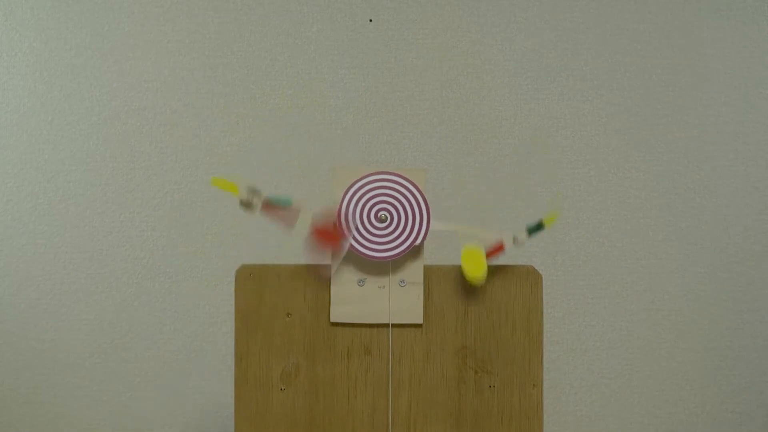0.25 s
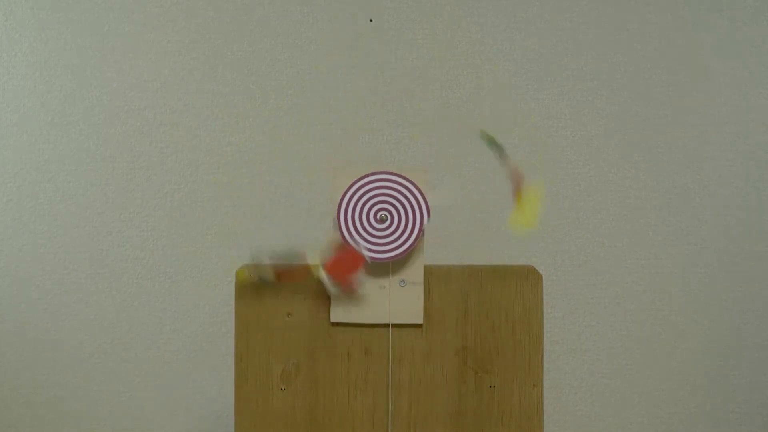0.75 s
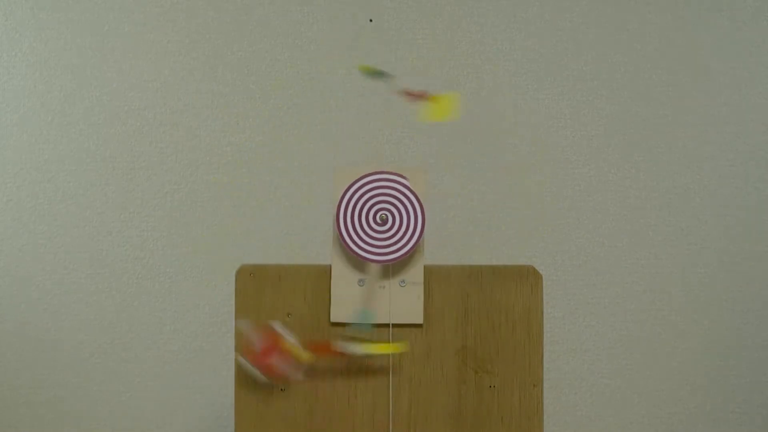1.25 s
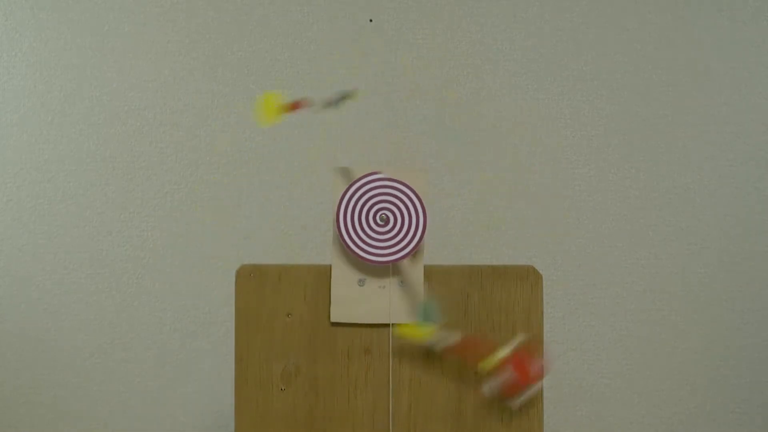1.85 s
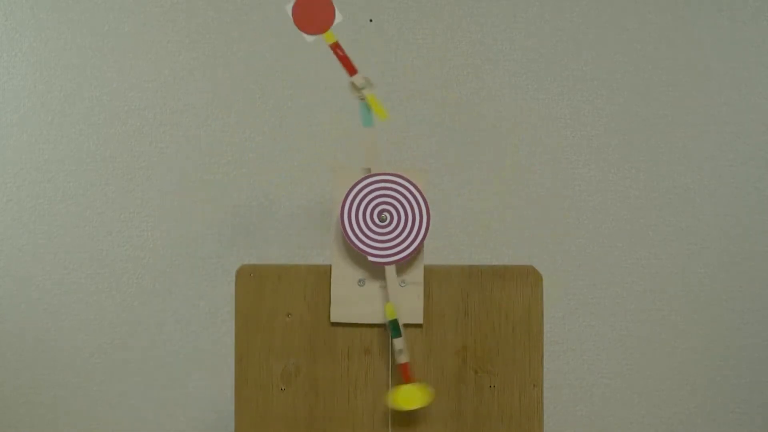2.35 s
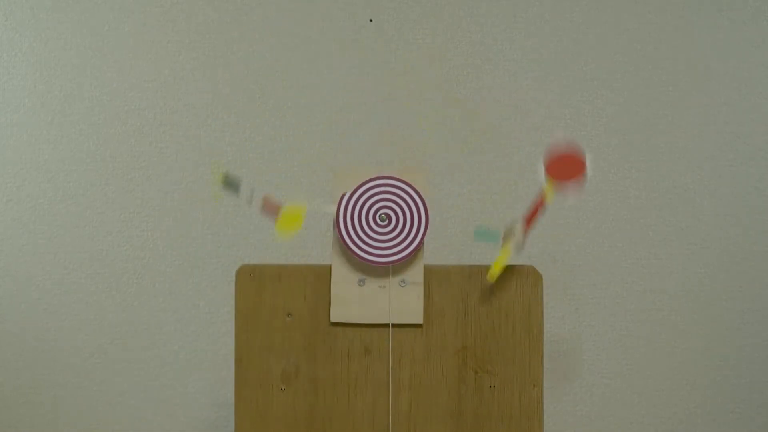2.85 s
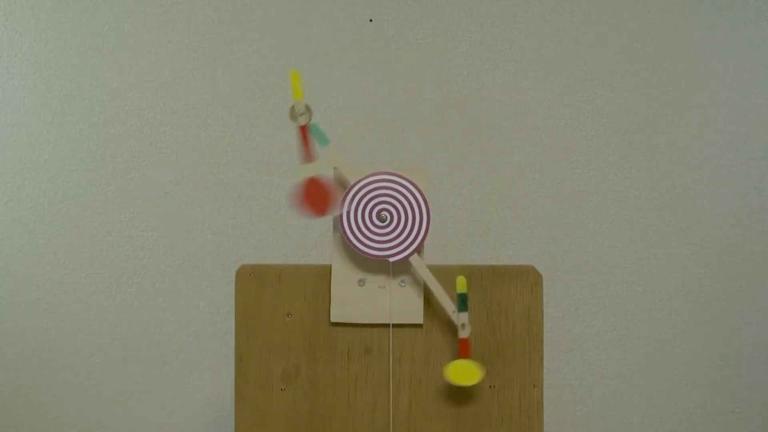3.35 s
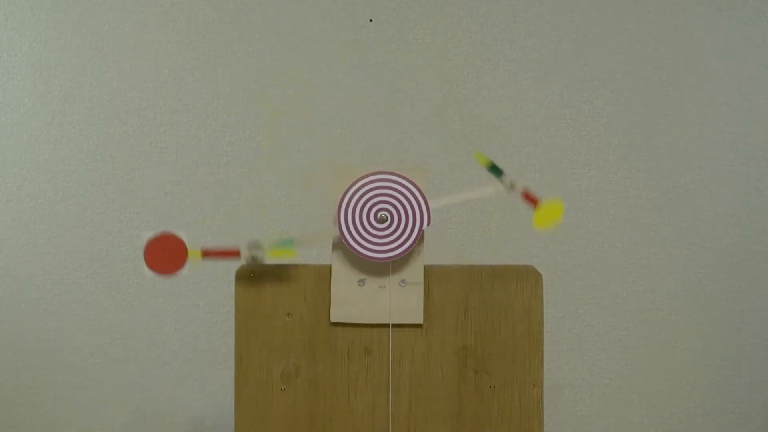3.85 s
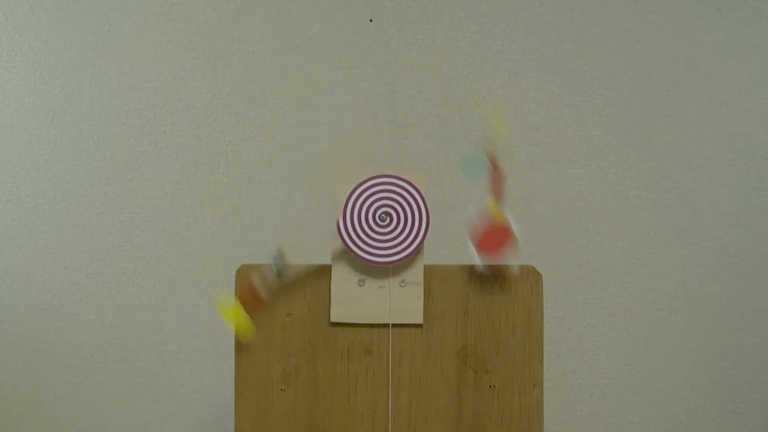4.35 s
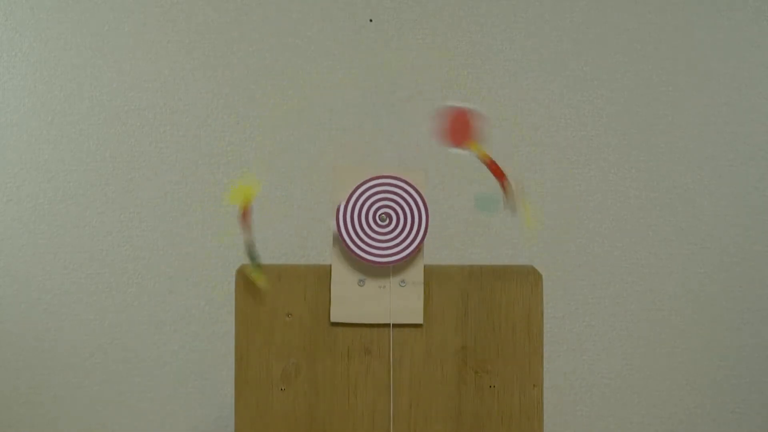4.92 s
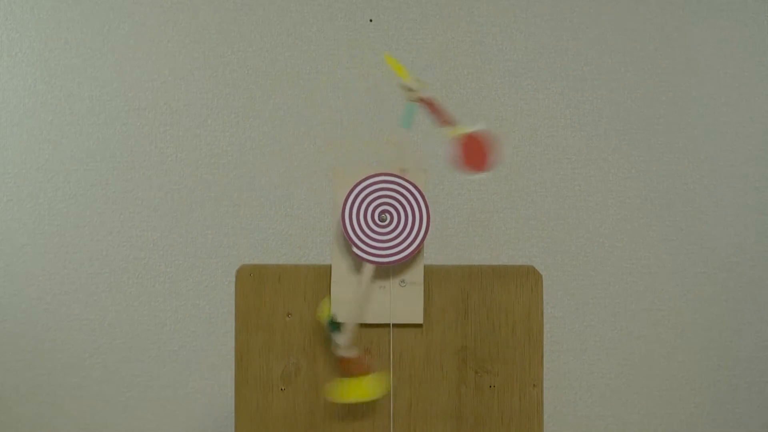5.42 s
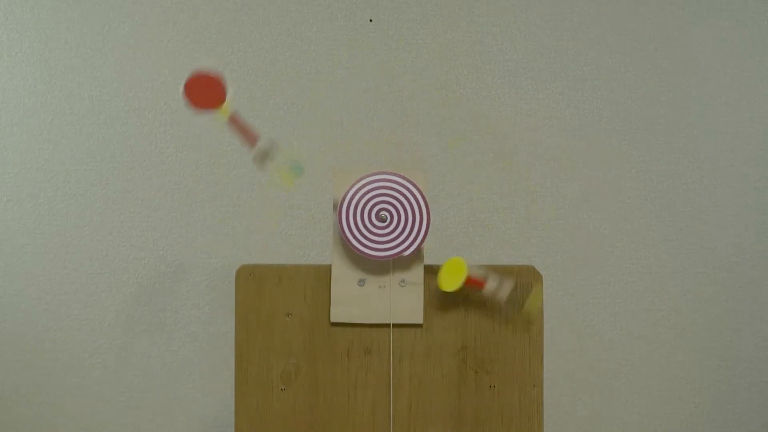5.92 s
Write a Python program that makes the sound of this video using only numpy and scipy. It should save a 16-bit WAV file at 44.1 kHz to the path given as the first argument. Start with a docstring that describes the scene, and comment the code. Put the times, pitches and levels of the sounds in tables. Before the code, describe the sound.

Loose pivots clack against their steel pins as two swinging arms tumble on a wooden board. Early knocks are bright and crowded, followed by scattered faint taps and near-quiet gaps. Then a heavy double knock with a low board thump and short hollow ring starts another irregular run of ticks and clacks. Short room reflections follow each contact, over faint bearing friction and a constant soft hiss, heard in stereo from nearby.

```python
"""Knocks of loose pivots lead, as a wooden double-pendulum sculpture tumbles on a board in a small room.
Each knock is a contact with echoes, filtered noise swelling in the resonant frame, modes and a room tail.
Steel pins ping as decaying sines with narrow-band noise, and heavy knocks shake the board as low noise.
One hard jolt rings a whole arm as a sum of decaying modes.
The bearings rub faintly as noise heard through the frame, over a steady stereo hiss."""
import sys
import numpy as np
from scipy import signal
from scipy.fft import rfft, irfft, next_fast_len
from scipy.io import wavfile
from scipy.ndimage import uniform_filter1d

SR = 44100
rng = np.random.default_rng(int(sys.argv[2]) if len(sys.argv) > 2 else 0)


def dump_mix(stems):
    """Bounce the given channels to the path in sys.argv[1] as a 16-bit WAV at rate SR."""
    frames = np.atleast_2d(stems).T  # one column per channel
    limited = np.clip(frames, -1, 1)  # hard clip at full scale
    pcm = np.round(limited * 32767).astype(np.int16)
    wavfile.write(sys.argv[1], SR, pcm)


N = 272528  # length of the scene [samples]
TOP_HZ = 15700  # upper band limit
T = np.arange(2 * SR // 5) / SR  # time axis of one event [s]

# resonances of the wooden frame: (centre [Hz], width [Hz], peak over its broad response [dB])
FRAME_MODES = [(183.2, 10.7, 13.5), (427, 51, 12.5), (478.6, 33, 10), (533, 19, 21), (615, 19, 14),
               (838, 22, 7), (975, 30, 3), (1236, 26, 4), (1376, 24, 3), (1470, 24, 2), (1558, 32, 16),
               (1595, 44, 15), (1630, 44, 12), (1675, 32, 9), (1780, 45, 3), (2190, 32, 5), (2708, 40, 6),
               (2868, 40, 9), (3030, 44, 6), (3206, 30, 12), (3355, 40, 4), (3850, 59, 4.5), (4140, 46, 0),
               (4350, 9.8, -8), (5490, 270, 5.5), (7000, 3300, 6.5), (8350, 190, 2)]


def knocks(contact_t60=0.0084, alike=0.4):
    """Impact excitation: a brief contact force drives a resonant frame, whose sound decays into the room."""
    # pivot knocks: (time [s], strength [dB], brightness [dB per octave],
    #                click of the steel axle [dB], hardness of the contact [dB])
    pivot_knocks = [(0.0258, -39.5, -1, -3, -2), (.0602, -45.5, 2.5, 12, 5), (.086, -41.5, 4.5, 0, -4),
                    (0.4639, -28.5, 3.5, -6, 1.5), (0.561, -38, -1, -6, 1), (.5848, -42, -1, -6.5, -5),
                    (0.6938, -39.5, -2.5, 6, 7), (.7231, -34.5, 3.5, -5.5, 8.5), (0.7774, -40, 0.5, -5, -1),
                    (.804, -36, -4.5, -2, -13), (.8442, -48.5, 7.5, -7, -3), (.922, -39.5, 1.5, 3, 4),
                    (0.9296, -35, -.5, 11, -1), (.937, -31, -1.5, 0, 9), (1.2178, -50.5, -6, 1.5, 8),
                    (1.2605, -38, .5, -1, 1), (1.3814, -37.3, 0.6, -1.5, -11),
                    (1.5184, -38.5, 2.5, -0.5, 5.5), (1.6793, -51.5, -4.5, -8, -6),
                    (1.9103, -39.5, -1.5, 3.5, 1), (2.0336, -44, 1, -0.5, -3.5),
                    (2.0715, -45.5, -4, 8.5, 8), (2.1552, -42.5, 2.5, -6, 5), (2.323, -58, -1.5, 0, -10),
                    (2.5777, -49.5, 4.5, 5, 5), (3.0164, -48, .5, 3.5, 5), (3.1325, -47, 1, -3, 2),
                    (3.1826, -48.5, -6, 13.5, 0), (3.263, -43.5, 1.5, -5, 5), (3.4102, -53, 4.5, 2, -1),
                    (3.8657, -46.5, -1.5, -3, 13), (3.872, -41, -1.5, 8, -6), (3.9045, -45, 2, 4.5, 0),
                    (3.929, -46, 2, -1, 9), (4.2964, -40, -2, 13.5, 0), (4.304, -31.5, 3.5, -4.5, -3),
                    (4.3316, -41, -7.5, 16, 7), (4.362, -47, -8.5, 21, 0), (4.4139, -38.5, 2, -13, 0),
                    (4.517, -45.5, -.5, 5, 0), (4.555, -43, 4, -4, 6), (4.613, -38, 0, 0, 0),
                    (4.7175, -41, 4, -14, 7), (4.746, -48.5, 3.5, -9, 6), (4.7986, -31, 0, -4.5, 3),
                    (4.865, -48, -2.5, -2, -8), (5.0623, -53, 0.5, -7, 4), (5.1047, -41, -4, 1.5, 8),
                    (5.2184, -36.5, 0.5, -3.5, 1), (5.328, -40.5, 1.5, -7.5, 2), (5.366, -49.5, 3.5, -1, 4),
                    (5.402, -46, 0.5, -1, 3), (5.4324, -46.5, -5, -3.5, -17), (5.515, -54, 1, -6, 6),
                    (5.725, -45.5, 0.5, 3.5, 5), (5.8408, -45.5, 1, -3, 8), (5.8735, -39.5, -1.5, 2, 2.5),
                    (5.9663, -41, 3.5, -13, 2.5)]
    # answer of each register: (low edge [Hz], high edge before the band limit [Hz], swell [s],
    #                           body t60 [s], room t60 [s], room [dB], contact [dB], clean ring [dB])
    registers = [(99, 298, 0.013, 0.28, 1, -7.5, -25, -5.5),
                 (350, 1110, 0.0083, 0.082, 0.37, -11.5, -11, 1.5),
                 (1090, 2205, 0.0021, 0.046, 0.26, -7.5, -4.5, -6.5),
                 (1900, 2980, 0.0058, 0.12, 0.29, -7.5, -0.5, -8),
                 (3204, 4770, 0.005, 0.069, 0.26, -4.5, 3, -5.5),
                 (4880, 7930, 0.0051, 0.05, 0.27, 0, 8.5, -34),
                 (7930, 20000, 0.0039, 0.056, 0.36, -1.5, 4, -22)]
    # the board and the wall behind throw each contact back: (delay [s], level [dB])
    echoes = [(.0048, -0.5), (.0072, -20), (.0092, -15)]

    times, strength_db, bright_db, steel_db, hardness_db = np.transpose(pivot_knocks)
    rings = np.array([[ring()] for _ in times])
    contacts = amp(hardness_db)[:, None, None] * fade(contact_t60)
    for delay, db in echoes:  # equally strong for hard and soft contacts
        add(contacts, delay, amp(db) * fade(contact_t60))

    out = np.zeros((2, N))
    for lo, hi, swell, body_t60, room_t60, room_db, contact_db, ring_db in registers:
        level_db = voicing(np.sqrt(lo * hi), strength_db, bright_db, steel_db)
        band = signal.butter(4, [lo, min(hi, TOP_HZ)], "band", fs=SR, output="sos")
        rise = 1 - np.exp(-(T / swell) ** 2)  # the lowest bending waves take longest to fill the frame
        spread = rise * np.hypot(fade(body_t60), amp(room_db) * fade(room_t60))
        envelope = np.hypot(spread, amp(contact_db) * contacts)

        # some paths are the same for every knock, others change as the arms turn
        fixed_paths = rng.standard_normal((2, len(T)))
        changing_paths = rng.standard_normal((len(times), 2, len(T)))
        paths = np.sqrt(alike) * fixed_paths + np.sqrt(1 - alike) * changing_paths

        hits = struck(signal.sosfilt(band, filtered(paths * envelope, frame)))
        hits[:, :1] += amp(ring_db) * struck(signal.sosfilt(band, rings * rise))
        for s, db, hit in zip(times, level_db, struck(hits)):
            add(out, s, amp(db) * hit)
    return out


def voicing(hz, strength_db, bright_db, steel_db):
    """Spectral balance of an impact: the wood's colour is tipped by brightness, with the steel's click on top."""
    # colour of an average knock: (frequency [Hz], level in the register around it [dB])
    knock_colour = [(173, -24.5), (630, -.3), (1560, 0.16), (2400, -2), (3860, -6), (6180, -9),
                    (11600, -22.5)]
    # how far a register follows the brightness: (frequency [Hz], octaves from the frame's main clack,
    #                                             levelling off at both ends)
    tilt = [(170, -1.4), (630, -1.21), (1560, -0.13), (2400, .6), (3860, 1.48), (6100, 1.3), (11000, 1.54)]
    # the steel axle clicks only in the treble: (frequency [Hz], share of its click level [ratio])
    steel_reach = [(3900, 0), (6100, 0.96), (11000, 1.32)]
    wood_db = strength_db + along(knock_colour, hz) + bright_db * along(tilt, hz)
    return wood_db + steel_db * along(steel_reach, hz)


def frame(hz):
    """Minimum-phase resonance: the frame's peaks stand on a broad base and respond only after the force."""
    # broad response of the frame: (frequency [Hz], level [dB])
    broad = [(100, -11), (300, 1), (1000, 5), (3000, 4.5), (4500, 0), (7400, -5), (8600, -9), (11000, -9.5),
             (15500, -28)]
    peaks = sum(amp(db) ** 2 / (1 + (2 * (hz - centre) / width) ** 2) for centre, width, db in FRAME_MODES)
    magnitude = np.sqrt(1 + peaks) * amp(along(broad, hz))
    # folding the cepstrum onto positive time makes the response causal
    cepstrum = irfft(np.log(magnitude))
    half = len(cepstrum) // 2
    cepstrum[1:half] *= 2
    cepstrum[half + 1:] = 0
    return np.exp(rfft(cepstrum))


def ring(scatter_db=1.0):
    """Modal superposition: each frame mode starts at a random strength and decays as fast as its width sets."""
    hz, width, db = np.transpose(FRAME_MODES)[:, :, None]
    t = T[:SR // 7]
    strength = amp(db + scatter_db * rng.standard_normal(hz.shape)) * np.sqrt(width)
    decay = np.exp(-np.pi * width * t)
    modes = strength * decay * np.sin(2 * np.pi * (hz * t + rng.random(hz.shape)))
    return np.pad(modes.sum(0), (0, len(T) - len(t)))


def struck(hits):
    """Energy normalization: hits (event, channel, time) get rms 1 in channel 0 over their first 30 ms."""
    return hits / np.std(hits[:, :1, T < .03], axis=2, keepdims=True)


def pings(width_hz=320, ring_t60=0.033, room_t60=0.31, room_db=-14, level_db=-10):
    """Free vibration: a touched steel pin rings briefly at one high pitch, which lingers in the room."""
    # steel pins touch: (time [s], level before the common level_db [dB], pitch [Hz])
    pin_touches = [(0.0607, -23, 6700), (.0598, -24, 7230), (0.4635, -12, 3910), (0.723, -18.5, 5860),
                   (1.9105, -29.5, 7460), (2.071, -35, 7300), (2.578, -29, 3410), (2.578, -32, 6300),
                   (2.579, -36, 8640), (3.8717, -22, 5640), (3.905, -23.5, 5700), (4.2962, -16, 6370),
                   (4.3316, -20, 6200), (4.3622, -26, 6270), (4.754, -23, 2900), (5.105, -32, 7400),
                   (5.2182, -25, 7230), (5.5139, -38, 5660)]
    out = np.zeros((2, N))
    for s, db, pitch in pin_touches:
        noise = rng.standard_normal((2, len(T)))
        echo = unit(filtered(noise, lambda hz: 1 / (1 + (2 * (hz - pitch) / width_hz) ** 2)))
        ping = amp(room_db) * echo * fade(room_t60)
        ping[0] += np.sin(2 * np.pi * pitch * T) * fade(ring_t60)
        add(out, s, amp(db + level_db) * ping)
    return out


def thuds(swell=0.0037, t60=0.21):
    """High modal density: the board answers a heavy knock with a short rumble, modelled as shaped noise."""
    # knocks that also shake the board underneath: (time [s], level [dB])
    heavy_knocks = [(.466, -43), (.935, -38), (3.871, -40.5), (3.905, -47), (4.298, -33.5)]
    # colour of the board: (frequency [Hz], relative level [dB])
    board = [(40, -30), (90, -13), (130, -5), (260, 2.5), (400, -1), (600, -10), (850, 2), (1100, -5),
             (1500, -22), (4000, -60)]
    out = np.zeros((2, N))
    for s, db in heavy_knocks:
        noise = rng.standard_normal((2, len(T)))
        rumble = unit(filtered(noise, lambda hz: amp(along(board, hz))))
        add(out, s, amp(db) * rumble * fade(t60) * (1 - np.exp(-T / swell)))
    return out


def jolts(time_s=4.299, level_db=-26, swell=0.0053):
    """Modal ringing: one hard blow leaves the modes of a whole arm to decay, each at its own rate."""
    # modes of the arm: (frequency [Hz], level before level_db [dB], t60 [s])
    arm_modes = [(123, -22, .7), (198, -15, .6), (227, -13, .8), (339, -17, .35), (492, -8, .3),
                 (619, -8, .25), (831, -9, .3), (1087, -13, .4), (3206, -3, .2), (524, -1, .33),
                 (539, -2, .3), (717, 0, .5)]
    arm = 0
    for hz, db, t60 in arm_modes:
        arm = arm + amp(db) * fade(t60) * np.sin(2 * np.pi * (hz * T + rng.random()))
    out = np.zeros((2, N))
    add(out[0], time_s, amp(level_db) * arm * (1 - np.exp(-T / swell)))
    return out


def bearings(level_db=-5.0):
    """Friction excitation: rubbing axles act as broadband noise, which sounds through the frame."""
    # rubbing, strong while the arms tumble and faint while they coast:
    # (time [s], level before the common level_db [dB])
    rub_course = [(0, -48), (.7, -42.5), (1.0, -49.5), (2.1, -53), (2.7, -75), (3.4, -63), (4.2, -55),
                  (4.6, -51), (5.45, -48), (5.7, -54), (6.18, -51.5)]
    noise = rng.standard_normal((2, N))
    rub = unit(filtered(noise, lambda hz: frame(hz) * hz ** 2 / (hz ** 2 + 250 ** 2)))  # bass weakened
    course_db = np.interp(np.arange(N) / SR, *np.transpose(rub_course))
    return rub * amp(course_db + level_db)


def hiss(level_db=-50.5):
    """Stationary random noise: the room and microphone give a steady, spectrally shaped stereo hiss."""
    # colour of the hiss: (frequency [Hz], relative level [dB])
    hiss_colour = [(15, -58), (25, -27), (64, -22.5), (89, -17.5), (269, -6.5), (333, -7), (403, -4),
                   (604, -3.5), (1090, -3.5), (1250, -3), (1510, -6), (2590, -7), (2970, -10),
                   (4820, -13.5), (15800, -24)]
    # stereo spread of the hiss: (frequency [Hz], side relative to mid [dB])
    hiss_spread = [(60, -15), (110, -20), (200, -12.5), (380, -9.5), (700, -6), (1290, -5), (2380, -5),
                   (4400, -4.5), (8120, -5.5), (15000, -37)]
    noise = unit(filtered(rng.standard_normal((2, N)), lambda hz: amp(along(hiss_colour, hz))))
    return amp(level_db) * stereo(noise, hiss_spread)


def stereo(pair, width):
    """Mid-side decomposition: the second of two signals, scaled by width, is the side of the first."""
    side = filtered(pair[1], lambda hz: amp(along(width, hz)))
    return np.array([pair[0] + side, pair[0] - side])


def fade(t60):
    """Exponential decay: the level falls 60 dB in t60 seconds."""
    return np.exp(-np.log(1000) * T / t60)


def add(track, s, sound):
    """Linear superposition: a sound joins the track at time s, cut off at the track's end."""
    part = track[..., round(s * SR):][..., :sound.shape[-1]]
    part += sound[..., :part.shape[-1]]


def filtered(x, response):
    """Convolution theorem: the spectrum of x is multiplied by a response of frequency."""
    n = x.shape[-1]
    m = next_fast_len(n + SR // 5, True)  # room for the filter's tail
    return irfft(rfft(x, m) * response(np.fft.rfftfreq(m, 1 / SR)), m)[..., :n]


def along(points, hz):
    """Logarithmic frequency scale: (frequency [Hz], value) points are interpolated along it."""
    f, v = np.transpose(points)
    return np.interp(np.log(hz + 1), np.log(f + 1), v)


def amp(db):
    """Level definition: 20 dB are a factor of ten in amplitude."""
    return 10 ** (np.asarray(db) / 20)


def unit(x):
    """Root-mean-square normalization: x is scaled to rms 1."""
    return x / np.sqrt(np.mean(x ** 2) + 1e-20)


def scene():
    """Interaural level difference: the sculpture leans slightly left of centre, over the hiss."""
    # the room's spread: (frequency [Hz], side relative to mid [dB])
    room_spread = [(100, -59), (500, -18), (1200, -12.5), (7000, -11), (11000, -19)]
    # lean to the left: (frequency [Hz], left relative to right [dB])
    lean = [(120, 0.5), (300, 0), (600, 1.5), (1400, 3), (2800, 1.9), (5500, 0.5), (9000, 0)]
    sculpture = stereo(knocks() + pings() + thuds() + jolts() + bearings(), room_spread)
    return filtered(sculpture, lambda hz: amp(np.outer([1, -1], along(lean, hz)) / 2)) + hiss()


def record(dry):
    """Ideal low-pass filtering: nothing at or above the band limit remains."""
    return filtered(dry, lambda hz: hz < TOP_HZ)


dry = scene()
out = record(dry)
dump_mix(out)
```